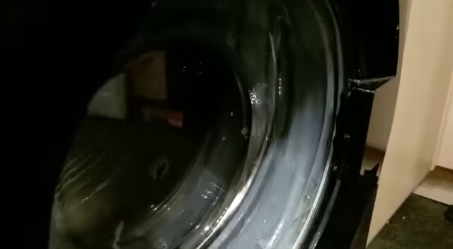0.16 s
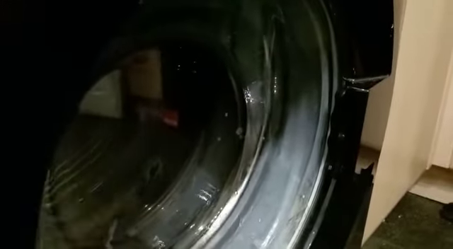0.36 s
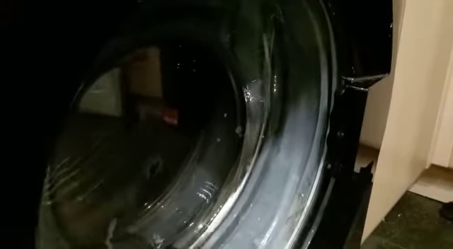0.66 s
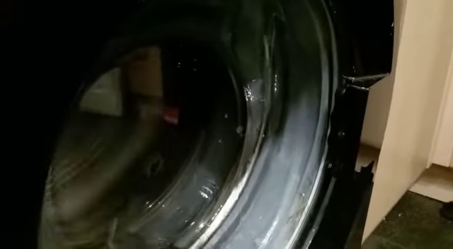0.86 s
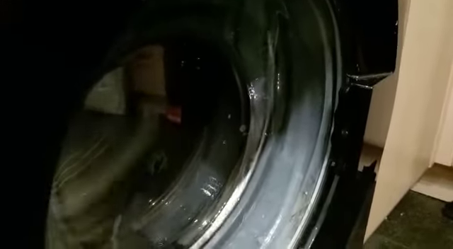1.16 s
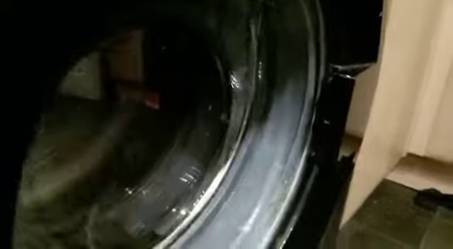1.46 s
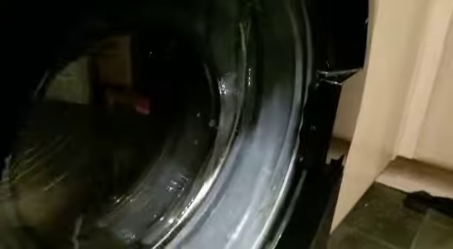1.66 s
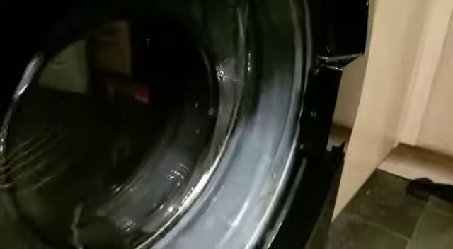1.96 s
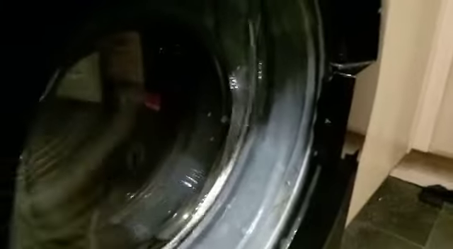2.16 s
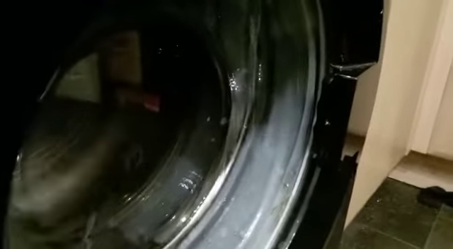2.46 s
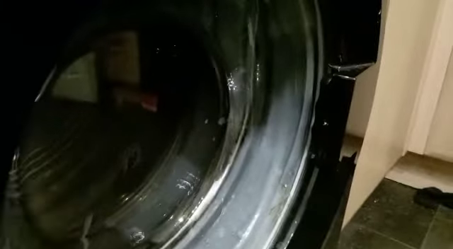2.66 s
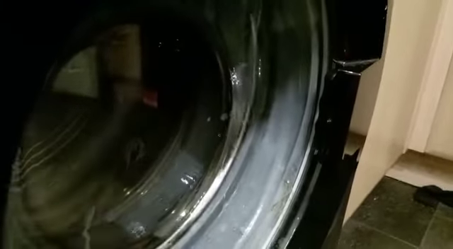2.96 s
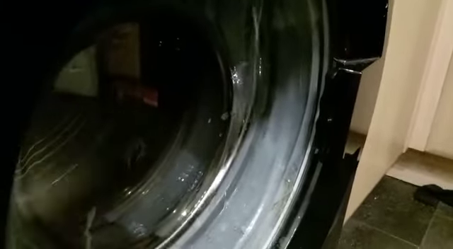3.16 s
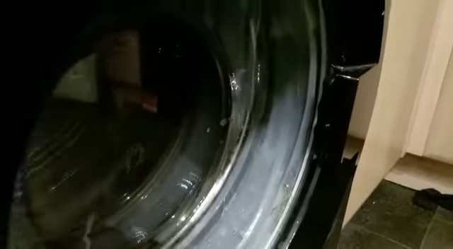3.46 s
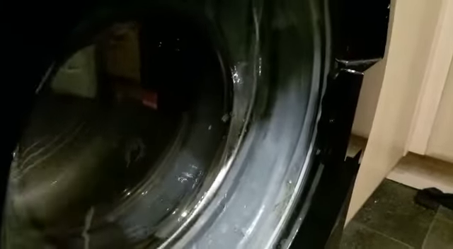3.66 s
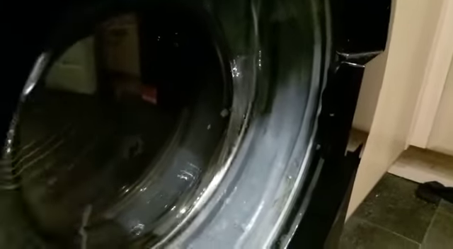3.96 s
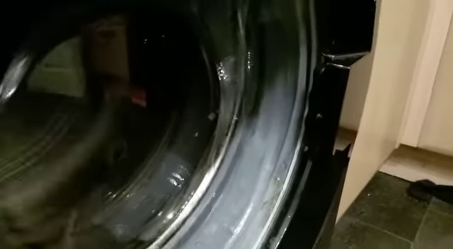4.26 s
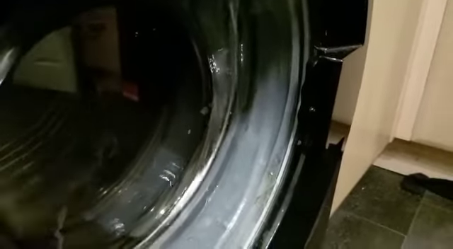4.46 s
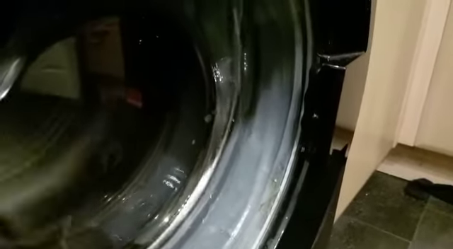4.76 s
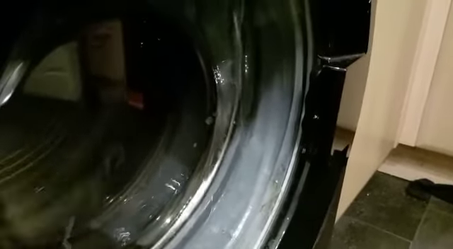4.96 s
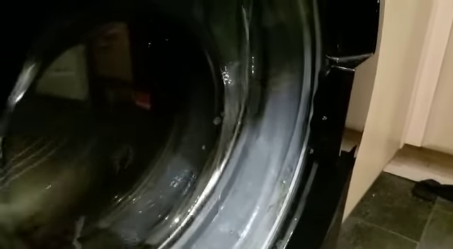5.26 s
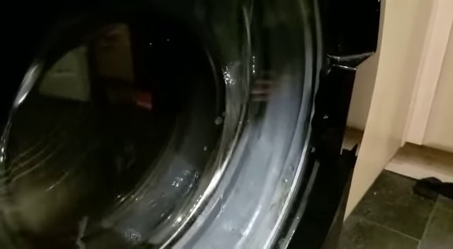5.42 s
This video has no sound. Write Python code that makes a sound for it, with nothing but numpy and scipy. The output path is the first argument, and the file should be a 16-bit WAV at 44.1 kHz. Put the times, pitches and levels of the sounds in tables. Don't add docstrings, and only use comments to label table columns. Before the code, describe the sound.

Close low drum rumble and airy roar of a slowing washer, with a piercing falling whine, ringing door and loose trim taps.

```python
import sys
import numpy as np
from scipy import signal
from scipy.fft import rfft, irfft
from scipy.io import wavfile
from scipy.ndimage import uniform_filter1d

SR = 44100
rng = np.random.default_rng(int(sys.argv[2]) if len(sys.argv) > 2 else 0)


def invert_db(level):
    return 10 ** (np.asarray(level, dtype=float) / 20)


def bounce(signal):
    frames = np.transpose(np.atleast_2d(signal))
    limited = np.clip(frames, -1, 1)
    pcm = np.round(limited * 32767).astype(np.int16)
    wavfile.write(sys.argv[1], SR, pcm)


N = 246512
T = np.arange(N) / SR
START_TPS = 168.081
BELT = 12.2024
EAR_DELAY = 14

# f/Hz, likeness (1 = same, 0 = unrelated)
LIKENESS = [(60, 1), (150, 1), (380, 0.71), (950, 0.18), (2380, -0.17), (5980, -0.53), (15000, 0.06)]


def evened(x):
    return x / np.sqrt(np.mean(x ** 2) + 1e-20)


def read(points, hz):
    f, value = np.transpose(points)
    return np.interp(np.log(hz + 1), np.log(f + 1), value)


def peak(hz, centre_hz, width):
    return 1 / (1 + (2 * (hz - centre_hz) / width) ** 2)


def drift(hz, count=1):
    z = rfft(rng.standard_normal((count, N)))
    return evened(irfft(z / (1 + (np.fft.rfftfreq(N, 1 / SR) / hz) ** 4), N))


def cycle(multiples, db, phases, turns):
    size = 2 ** 14
    z = np.zeros(size // 2 + 1, complex)
    z[multiples] = invert_db(db) * np.exp(1j * phases) * size / 2
    wave = irfft(z)
    return np.interp(turns % 1 * size, np.arange(size + 1), np.append(wave, wave[0]))


def room(x, t60=0.89):
    length = SR // 2
    taps = rng.choice([-1., 1.], (2, length)) * (rng.random((2, length)) < .05)
    taps *= invert_db(-60 * T[:length] / t60) * (T[:length] > .003)
    return signal.oaconvolve(x[None], taps / np.linalg.norm(taps[0]), axes=1)[:, :N]


def speed():
    return START_TPS - 5.71919 * T + .148878 * T ** 2 - .0106123 * T ** 3


def drum_turns(lead=0):
    rate = np.pad(speed(), (lead, 0), "edge") / BELT
    start_turn = .18
    return start_turn + (np.cumsum(rate) - lead * rate[0]) / SR


def seam():
    lap_turns, lap_start = 16.38, .55
    return np.cos(2 * np.pi * (np.cumsum(speed()) / SR / lap_turns - lap_start))


def drum():
    # multiple of drum speed, level/dB
    shake_levels = [(4, -37), (5, -4.5), (6, -20), (7, 4), (8, -14), (9, 6.5), (10, -14), (11, 5),
                    (12, -9.5), (13, 6), (14, -11), (15, 2.5), (16, -9.5), (17, -1), (18, -25), (19, -3.5),
                    (20, -18), (21, -6), (22, -7), (23, -3.5), (24, -6), (25, 2.5), (26, -17), (27, 0),
                    (28, -22), (29, -15), (31, -15.5), (33, -4)]
    # f/Hz, level/dB
    cabinet = [(40, -75.5), (56, -38), (70, -20.5), (85, -39.5), (110, -28), (135, -28.5), (150, -35),
               (180, -28), (195, -44), (230, -27.5), (250, -34), (290, -46.5), (370, -49), (450, -58)]
    # f/Hz, width/Hz, level/dB
    resonances = [(92.9, 4.1, 9.5), (107, 1.45, 6), (135.8, 2.9, 3), (167.1, 1.7, -25), (186.3, 8.1, 1),
                  (201.6, 9.1, 11.5), (210.7, 1, -4), (223, 10.5, 11.5), (270.5, 10.6, 17),
                  (276.7, 5.5, -8), (302, 14, 9.5), (313, 2.6, -26), (336, 21, -4.5), (348, 3.3, -30),
                  (362, 3.2, 14)]
    k, db = np.transpose(shake_levels)
    phases = 1.36 + .056 * k ** 2
    shoves = cycle(k.astype(int), db, phases, drum_turns(SR))
    hz = abs(np.fft.fftfreq(2 ** 16, 1 / SR))
    gain_db = read(cabinet, hz) + sum(g * peak(hz, f, w) for f, w, g in resonances)
    log_gain = gain_db * np.log(10) / 20
    body = np.fft.ifft(np.exp(log_gain - 1j * signal.hilbert(log_gain).imag)).real[:SR]
    shake = signal.oaconvolve(shoves, body)
    left = shake[SR + EAR_DELAY // 2:][:N]
    right = shake[SR - EAR_DELAY // 2:][:N]
    direct = np.array([invert_db(-2.63) * left, invert_db(-3.2) * right]) * invert_db(0.073 * drift(2.1))
    return direct + invert_db(-41) * room(left) * [[1], [-1]]


def motor():
    bar_multiples = [18, 35, 36, 54, 72, 90, 108]
    bar_db = [-61.5, -57, -42.5, -53, -49.5, -59, -54]
    fade_depths = [.5, 2.2, 2.2, 1.2, .9, .8, .5]
    # level/dB of the multiples 2 below, 1 below, 1 above, 2 above
    neighbours = [
        (-22, -30, -15, -10),
        (-32, -13, -45, -21),
        (-22, -38, -12, -19),
        (-15, -9, -10.5, -28),
        (-8, -11.5, -10, -29),
        (-17, -10, -10, -15),
        (-16, -6, -1, -30),
    ]
    # f/Hz, level/dB
    comb = [(1500, -55), (4000, -66.5), (7000, -59.5), (10000, -111), (13000, -73), (16000, -92)]
    # f/Hz, width/Hz, level/dB, left minus
    # right/dB
    sweep_peaks = [(2534, 61, 12.5, 12), (2688, 69, 13, 0), (2880, 17, 6, 3), (2790, 13, 3, 14),
                   (2930, 43, 1, -7), (3018, 150, 9, -18.5), (4950, 72, 8, -9), (5330, 43, -4, 5),
                   (5340, 17, 8, 0), (5320, 22, 4.5, 3), (5512, 115, 6, -5), (5813, 90, 1.5, -10),
                   (5980, 98, 2.5, 4), (6090, 170, 4.5, -11),
                   (7560, 190, 2, 6), (7890, 150, 1, 3), (8085, 170, 4.5, 3), (8380, 270, -6.5, 23),
           (9760, 90, 4, 3), (10100, 120, 2, -3), (10320, 300, 6, 1), (10470, 100, 0, -5),
           (11000, 660, 1.5, -7), (11230, 120, 1, 0), (11650, 99, 2, 11.5), (13500, 660, 3, 9),
           (14580, 250, 6, 3), (15320, 130, -1, 11)]
    # f/Hz, width/Hz, level/dB
    brush_sing = (5625, 98, 20)
    sing_hz, sing_width, sing_db = brush_sing

    drum_angle = 2 * np.pi * drum_turns()
    tug_turns, jitter_turns = .0035, .0015
    turns = np.cumsum(speed()) / SR + tug_turns * np.sin(drum_angle) + jitter_turns * drift(30)[0]
    every = np.arange(10, 114)
    comb_db = read(comb, every * 163.0) + 0.66 * rng.standard_normal(len(every))
    whine = np.zeros((2, N)) + cycle(every, comb_db, 7 * rng.random(len(every)), turns)

    sway = .004 * drift(2, count=2)
    flicker = 1 - np.minimum(drift(20, count=2) ** 2, 5)
    flicker = flicker - uniform_filter1d(flicker, SR // 5)
    load = 1.6 * np.cos(drum_angle + .4)
    coarse = np.arange(0, N, 256)
    halves = np.array([[.5], [-.5]])
    for k, near, db, fade_db in zip(bar_multiples, neighbours, bar_db, fade_depths):
        hz = k * speed()[coarse]
        lift = sum((g + halves * lean) * peak(hz, f, w) for f, w, g, lean in sweep_peaks)
        if k == bar_multiples[1]:
            lift = lift + sing_db * peak(hz, sing_hz, sing_width)
        levels = np.insert(near, 2, 0)
        group = cycle(k + np.arange(-2, 3), levels, 7 * rng.random(5), turns + sway)
        group = group * invert_db(fade_db * (np.roll(flicker, k * 999, axis=1) + load))
        whine += [np.interp(np.arange(N), coarse, invert_db(db + ear + 1.5)) for ear in lift] * group
    direct = np.array([whine[0], np.roll(whine[1], EAR_DELAY)])
    return invert_db(-1.0) * direct + invert_db(-10) * room(whine.mean(0), .35)


def roar():
    # f/Hz, level per Hz/dB
    colour = [(25, -29), (45, -46), (70, -17), (105, -1), (200, 0.5), (330, -4), (420, -11), (600, -9),
              (950, -5.5), (1150, -14), (2200, -22.5), (4500, -27.5), (8300, -29.5), (16000, -38)]
    # f/Hz, left minus right/dB
    tilt = [(60, 0), (130, 9.5), (290, -3), (640, 1.5), (1410, 2), (3100, -0.5), (6820, -3), (15000, 4.5)]
    frames, hz = N // 256 + 5, np.fft.rfftfreq(1024, 1 / SR)
    a, b, c, d, patches = rng.standard_normal((frames, 513, 5)).T
    patches = uniform_filter1d(patches, size=10, axis=0)
    patches = evened(uniform_filter1d(patches, size=8, axis=1))
    hz = hz[:, None]
    same = np.clip(read(LIKENESS, hz), -1, 1)
    left = a + 1j * b
    delayed = left * np.exp(-2j * np.pi * hz * EAR_DELAY / SR)
    right = same * delayed + np.sqrt(1 - same ** 2) * (c + 1j * d)
    z = np.array([left, right])
    throb = np.interp(np.arange(frames) * 256, np.arange(N), seam())
    z *= invert_db(1.37 * throb / (1 + (hz / 3500) ** 2))
    halves = np.array([.5, -.5])[:, None, None]
    z *= invert_db(read(colour, hz) + 0.95 * patches + read(tilt, hz) * halves)
    wash = evened(signal.istft(z, nperseg=1024, noverlap=768)[1][:, :N])
    speed_db = 37.5 * np.log10(speed() / START_TPS)
    return wash * invert_db(-28 + speed_db + 0.38 * np.sin(4 * np.pi * drum_turns()))


def ringing(hz, width, steady=0.):
    r = np.exp(-np.pi * width / SR)
    a, b = rng.standard_normal((2, 2, N))
    slow = signal.lfilter([1], [1, -2 * r, r * r], a + 1j * b)
    same = np.clip(read(LIKENESS, hz) + 0.15, 0, 1)
    slow[1] = same * slow[0] + np.sqrt(1 - same ** 2) * slow[1]
    slow = slow / abs(slow) ** steady
    return evened((slow * np.exp(2j * np.pi * hz * T)).real)


def panels():
    # f/Hz, width/Hz, level/dB
    hums = [(362, 32, -44), (445, 19.4, -47.5), (494.4, 30, -45.5), (606, 54, -47), (698, 31, -47.5),
            (935, 85, -61.5), (1460, 6, -54), (1852, 22, -54.5)]
    # start t/s, length/s, level/dB
    door_swells = [(0.537, 0.08, -34), (0.745, 0.046, -40), (0.822, 0.083, -29), (1.852, 0.02, -47),
                   (2.167, 0.047, -31), (2.28, 0.042, -30), (2.47, 0.16, -33.5), (2.595, 0.052, -32),
                   (2.678, 0.22, -32.5), (2.993, 0.09, -38.5), (3.07, 0.025, -34), (3.152, 0.079, -30),
                   (3.55, 0.046, -31), (3.753, 0.066, -35), (3.88, 0.1, -34.5), (4.102, 0.055, -29.5),
                   (4.182, 0.049, -35), (4.347, 0.039, -32), (4.438, 0.05, -25.5), (4.681, 0.023, -29.5),
                   (4.785, 0.064, -38), (5.115, 0.038, -47), (5.25, 0.037, -34), (5.362, 0.016, -54),
                   (5.417, 0.022, -35), (5.49, 0.012, -33)]
    # t/s, peak level/dB, f/Hz
    rattles = [(0.74, -9.5, 753), (0.819, -12.5, 730), (1.959, -20, 800), (2.475, -19, 780),
               (2.506, -10, 750), (3.005, -12.5, 767), (3.142, -13, 760), (3.329, -12, 760),
               (3.548, -22, 790), (3.589, -13, 756), (3.777, -9.5, 815), (3.879, -8, 777),
               (4.086, -33, 759), (4.461, -12, 744), (4.782, -11, 757), (4.802, -8, 760), (5.006, -19, 800),
               (5.366, -10, 770)]
    rings = sum(invert_db(db - 1.5) * ringing(hz, width) for hz, width, db in hums)

    swells, edge_s = np.zeros(N), 0.0089
    for s, length, db in door_swells:
        outside = np.maximum(abs(T - s - length / 2) - length / 2, 0)
        swells += invert_db(db - 5.0) * np.exp(-(outside / edge_s) ** 2)
    shove_db = 3 * np.cos(4 * np.pi * (drum_turns() - .2))
    drive = (invert_db(-39.5) + swells) * invert_db(0.5 * seam() + shove_db)
    door = drive * ringing(754, 31.0, steady=0.73)

    taps, t = np.zeros(N + 3000), T[:3000]
    for s, db, hz in rattles:
        fade = invert_db(db - 10.0 - 60 * t / 0.059)
        taps[round(s * SR):][:3000] += fade * np.sin(2 * np.pi * hz * t) * np.minimum(t / 0.00085, 1)
    left, right = (rings * invert_db(0.4 * seam()) + door + taps[:N]) * invert_db([[2.8], [-2.8]])
    return np.array([left, np.roll(right, EAR_DELAY)])


def scene():
    return drum() + motor() + roar() + panels()


def low_pass(x):
    return signal.sosfilt(signal.butter(12, 15800, fs=SR, output="sos"), x)


def record(dry):
    # f/Hz, width/Hz, level/dB
    port_notch = (9740, 800, -7.85)
    centre_hz, width, db = port_notch
    hz = np.fft.rfftfreq(N, 1 / SR)
    notch = invert_db(db / (1 + (2 * (hz - centre_hz) / width) ** 4))
    mix = irfft(rfft(dry) * notch, N)
    return low_pass(mix)


dry = scene()
out = record(dry)
bounce(out)
```